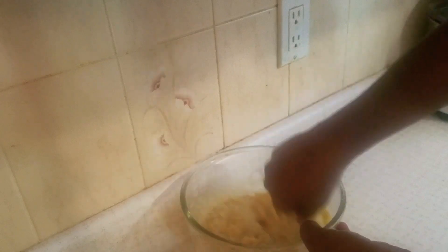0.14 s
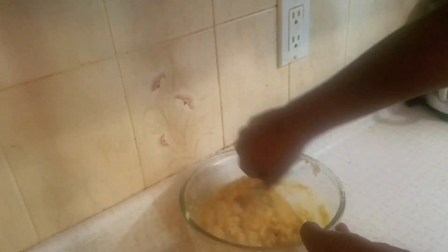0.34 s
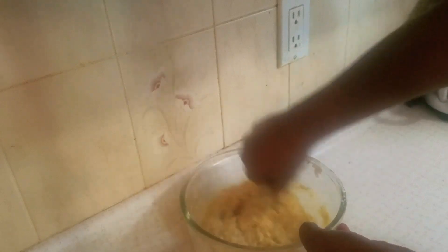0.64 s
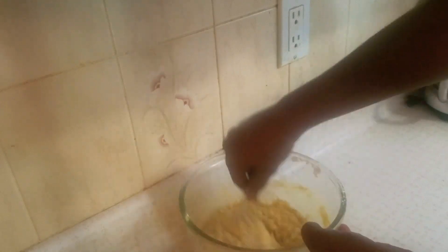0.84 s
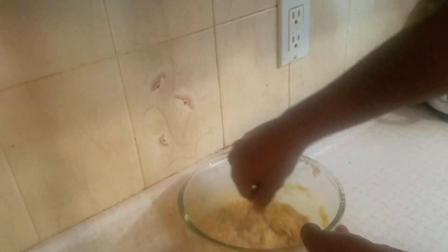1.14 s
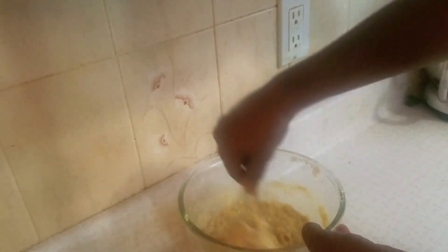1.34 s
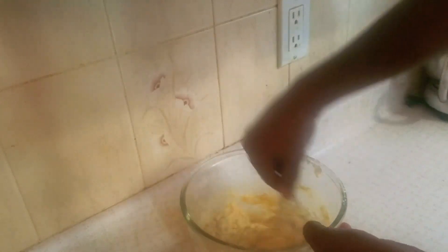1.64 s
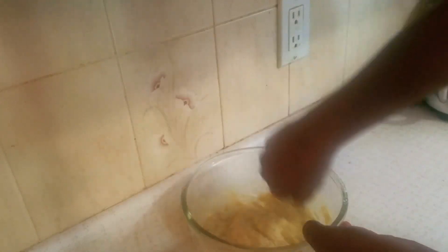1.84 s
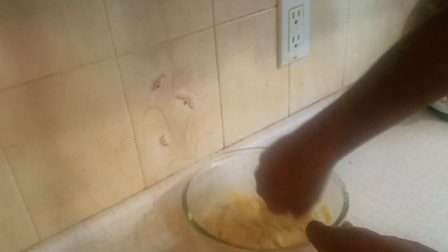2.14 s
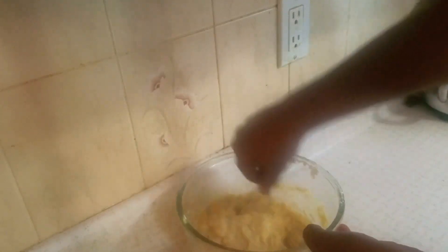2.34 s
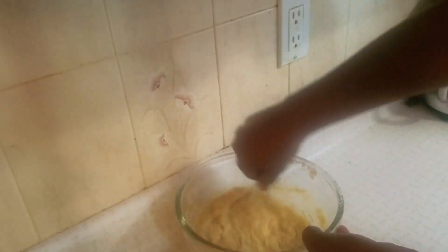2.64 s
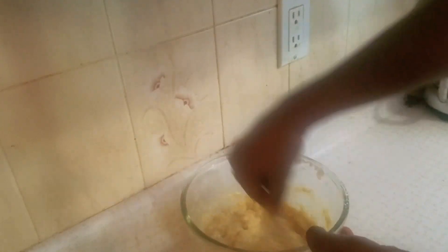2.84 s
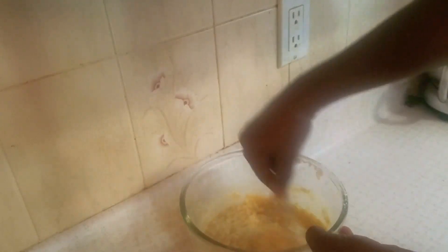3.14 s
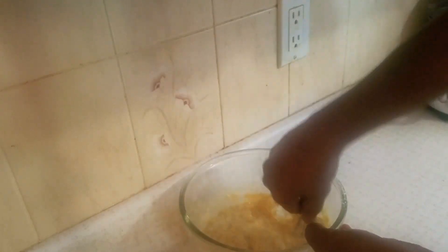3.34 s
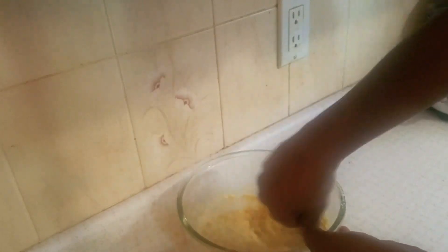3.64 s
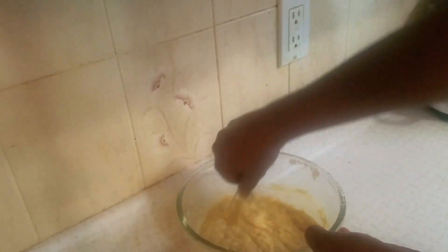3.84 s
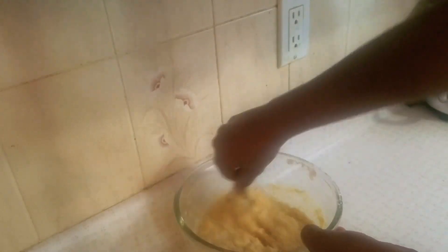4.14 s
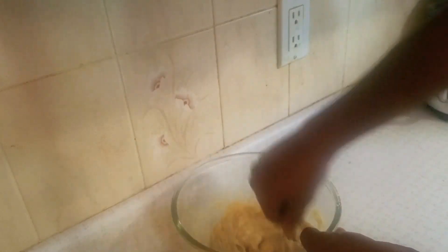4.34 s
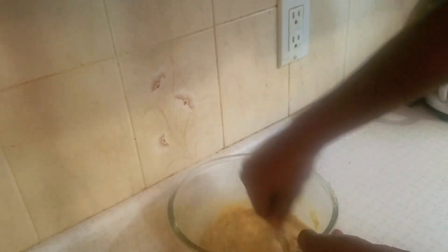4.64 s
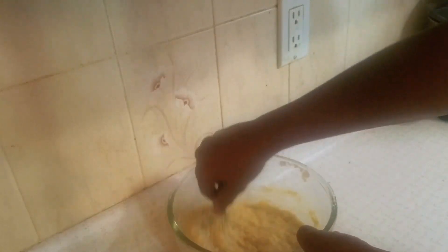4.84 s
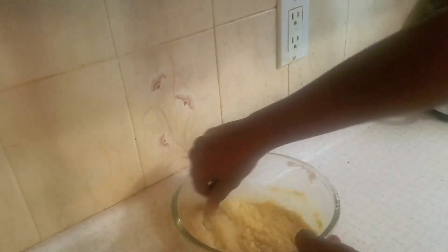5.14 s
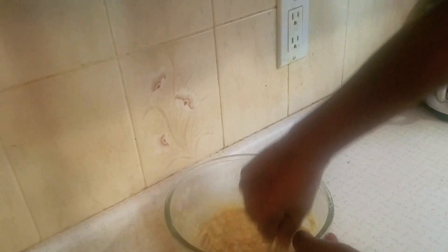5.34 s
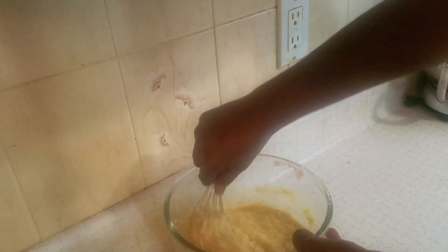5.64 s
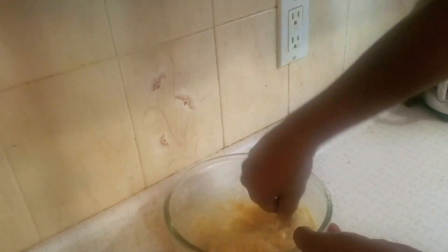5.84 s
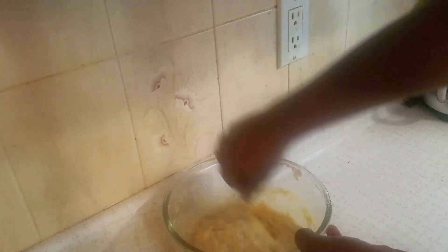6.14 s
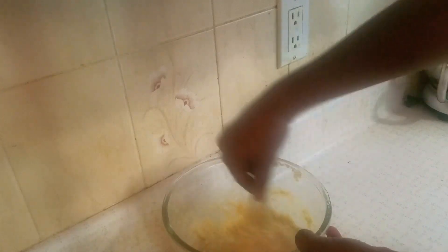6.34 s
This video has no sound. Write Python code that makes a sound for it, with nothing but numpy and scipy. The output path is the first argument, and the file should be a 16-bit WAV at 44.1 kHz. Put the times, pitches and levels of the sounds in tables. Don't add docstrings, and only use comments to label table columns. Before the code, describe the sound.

Close stereo sound of a wire whisk beating thick batter in a glass bowl, in a tiled kitchen with short bright echo and faint fridge hum. From the start there is wet, heavy sloshing with scratchy wire scrapes and light fizz. A strong hollow knock comes at 0.4 s, a bright scrape near 0.5, a duller bump at 0.6 and another knock at 0.9. Softer churning follows with small ticks around 1.3. At 1.85 a sharp metallic slap cracks on the glass. From 2 to 3 s come wet strokes, fine ticks and a longer drag at 2.7. A quick double knock with low boom hits at 3.3, then knocks at 3.6, 3.85, 4.2, a loud one at 4.5, 4.8, 5.1 and a last hard one at 5.2, with short bowl rings. Afterwards the churning quietens, with sticky smacks and a faint clink at 6.2 until about 6.5.

```python
import sys
import numpy as np
from scipy import signal
from scipy.io import wavfile
from scipy.ndimage import uniform_filter1d

SR = 44100
rng = np.random.default_rng(int(sys.argv[2]) if len(sys.argv) > 2 else 0)


def digitize_waveform(pressure):
    field = np.atleast_2d(pressure).T
    bounded = np.clip(field, -1, 1)
    quanta = np.round(bounded * 32767).astype(np.int16)
    wavfile.write(sys.argv[1], SR, quanta)


def undo_db(level):
    steps = np.asarray(level, float) / 20
    return 10 ** steps


N = 286650

# t/s, thock peak level/dB, counter boom level/dB, hardness/dB, body ring level/dB
KNOCK_EVENTS = [(0.376, -6.5, -19.5, -23, -13), (0.614, -24, -11.5, -33, -14),
                (0.908, -10.5, -17.5, -23.5, -13), (1.847, -31.5, -10, -16.5, -5),
                (3.266, -27.5, -3.5, -18.5, -7), (3.299, -32.5, -3, -24, -8), (3.572, -43, -4, -21, 4.5),
                (3.849, -11, -14.5, -26, -2), (4.18, -9.5, -14, -22, -13), (4.521, -4.5, -14, -19.5, -3.5),
                (4.799, -20, -16, -29, -14), (5.133, -38, -19, -26, -9), (5.23, -4.5, -16.5, -17, -7)]


def rms_one(x):
    return x / np.sqrt(np.mean(x ** 2) + 1e-20)


def at_hz(points, hz):
    table_hz, value = np.array(points)[:, :2].T
    return np.interp(np.log(hz), np.log(table_hz), value)


def lean(hz):
    # f/Hz, left minus right level/dB
    left_right_db = [(60, -2.5), (150, -1.5), (380, -4.5), (950, -3.0), (2380, -3), (5980, -4.5),
                     (15000, 1)]
    return undo_db(at_hz(left_right_db, hz) * np.array([[0.5], [-0.5]]))


def drift(rate_hz):
    r = np.exp(-80 * np.pi * rate_hz / SR)
    noise = rng.standard_normal(N // 40 + 2002)
    slow = signal.lfilter([1], [1, -2 * r, r * r], noise)[2000:]
    return np.interp(np.arange(N) / 40, np.arange(len(slow)), rms_one(slow))


def ring(clicks, hz, t60_s):
    r, w = undo_db(-60 / (t60_s * SR)), 2 * np.pi * hz / SR
    return signal.lfilter([0, np.sin(w)], [1, -2 * r * np.cos(w), r * r], clicks + 1e-18)


def bandpass(low_hz, high_hz):
    return signal.butter(2, [low_hz, high_hz], "band", fs=SR, output="sos")


def stereo_bands(source, low_hz, high_hz, likeness):
    edges_hz = np.geomspace(low_hz, high_hz, int(np.log2(high_hz / low_hz) * 2.0) + 2)
    for k, (low, high) in enumerate(zip(edges_hz, edges_hz[1:])):
        mid, side = signal.sosfilt(bandpass(low, high), source[k % 2])
        hz = np.sqrt(low * high)
        alike = np.clip(at_hz(likeness, hz), -1, 1)
        pair = np.sqrt(1 + alike) * mid + np.sqrt(1 - alike) * side * [[1], [-1]]
        yield hz, pair * lean(hz)


def wet_noise(spectrum, grains_per_s, grain_db, smooth, patchy_db):
    # f/Hz, left-right likeness
    port_likeness = [(60, 0.94), (150, 0.91), (380, 0.95), (950, 0.093), (2380, 0.045), (5980, 0.01),
                     (15000, 0.089)]
    born = rng.random((2, 1, N)) < grains_per_s * undo_db(3.0 * drift(9)) / SR
    size = born * undo_db(grain_db * np.minimum(rng.exponential(1, (2, 1, N)), 4))
    gate = signal.lfilter([1], [1, -0.985], size)
    source = rng.standard_normal((2, 2, N)) * (smooth + rms_one(gate))
    together = drift(16.0)
    low_hz, high_hz = spectrum[1][0] / 1.3, min(spectrum[-2][0] * 1.333, 17000)
    total = 0
    for hz, pair in stereo_bands(source, low_hz, high_hz, port_likeness):
        flicker_db = patchy_db * (0.5 * together + drift(13.1))
        total = total + undo_db(at_hz(spectrum, hz) + flicker_db) * pair
    return rms_one(total)


def swells(s, db, fade_s, rise_share):
    t = np.arange(0, N, 64)[:, None] / SR - s
    power = np.sum(undo_db(db - 10 * np.maximum(t, -t / rise_share) / fade_s) ** 2, axis=1)
    return np.interp(np.arange(N) / 64, np.arange(len(t)), power)


def gain_ride():
    # t/s, depth level/dB, recovery t/s
    ducks = [
        (0.376, 12, 0.11),
        (4.521, 11, 0.18),
        (5.23, 11.5, .5),
    ]
    attack_s = 0.065
    db, t = 0, np.arange(N) / SR
    for s, depth_db, back_s in ducks:
        since = np.maximum(t - s, 0)
        db = db - depth_db * (1 - np.exp(-since / attack_s)) * np.exp(-since / back_s)
    return undo_db(db)


def fridge_and_air(gain):
    # f/Hz, width f/Hz, level/dB
    hum_lines = [ (42, 25, -13), (58.8, 12, 0), (82, 22, -14), (100, 14, -9), (120, 9, 0), (174, 8, -8),
                 (300, 12, -11)]
    # f/Hz, density level/dB per Hz
    air_spectrum = [(74, -34), (125, -6.5), (203, -8.5), (312, -5), (497, -15), (550, -15.5), (843, -18),
                    (1520, -28), (2790, -34), (8020, -49), (15100, -37.5), (16000, -45)]
    hum = 0
    for hz, width_hz, db in hum_lines:
        has_core = hz in (58.8, 120)
        core = 1.8 * has_core * np.sin(2 * np.pi * hz * np.arange(N) / SR)
        skirt = rms_one(ring(rng.standard_normal(N), hz, 2.2 / width_hz))
        hum = hum + undo_db(db) * (core + skirt) * lean(hz)
    air = wet_noise(air_spectrum, 54, grain_db=0.5, smooth=24.0, patchy_db=1.07)
    return gain * undo_db(-42.5) * (undo_db(-4.0) * rms_one(hum) + undo_db(-7.0) * air)


def churn(gain):
    # peak t/s, scrape level/dB, fizz level/dB, 10 dB fade t/s
    strokes = [(0.0, -52.5, -58, 0.23), (0.181, -47, -54, 0.03), (0.34, -59, -55, 0.3),
               (0.47, -42.5, -47.5, 0.017), (0.74, -47.5, -58, 0.11), (0.89, -61, -56.5, 0.12),
               (1.08, -54, -58, 0.1), (1.4, -65.5, -64, .2), (1.66, -52.5, -58.5, 0.06),
               (1.58, -56, -60, .05), (1.989, -51.5, -52.5, 0.08), (2.17, -54.5, -59, 0.12),
               (2.3, -53, -57, 0.11), (2.55, -54.5, -59, .1), (3.02, -53, -61, .03),
               (3.12, -56.5, -57.5, 0.24), (3.43, -52, -57, 0.08), (3.55, -54, -65, 0.02),
               (3.67, -53.5, -57, 0.07), (3.85, -55, -63, 0.02), (4.0, -57, -63, .15),
               (4.18, -52.5, -59, 0.07), (4.31, -46.5, -52.5, 0.0555), (4.62, -51, -58, 0.0957),
               (5.03, -57, -70, 0.13), (5.34, -53, -62.5, 0.08), (6.25, -62.5, -64.5, 0.26),
               (6.49, -61, -66, 0.1)]
    # t/s, scrape level/dB, fizz level/dB, 10 dB fade t/s
    slaps = [
        (1.849, -32, -38, .025),
        (2.74, -45, -54, .13),
        (3.263, -38, -56, .025),
    ]
    # t/s, level/dB
    heaves = [(0.0, -47), (0.8, -50), (2.55, -44), (2.8, -48), (3.7, -45), (5.02, -44), (5.9, -53)]
    # f/Hz, density level/dB per Hz
    slosh_spectrum = [(76, -19), (130, 13), (145, -11.5), (167, 8), (248, -11.5), (364, 2.5), (401, -0.5),
                      (1300, -16), (1690, -49), (2860, -120)]
    scrape_spectrum = [(590, -31), (1000, -0.5), (1270, -9), (1770, -8.5), (1970, 5.5), (2260, -9.5),
                       (6210, -21), (8500, -19.5), (11000, -60), (18700, -120)]
    fizz_spectrum = [(4120, -18), (7000, -2), (8530, -28), (9880, -2), (15100, 2), (16000, -4),
                     (16500, -24)]
    stroke_rise_share, slap_rise_share = 0.75, 0.06
    rest_scrape_db, rest_fizz_db = -68, -71
    fold_db, fold_follows, fold_smear_s = -50, 0.3, 0.06
    splash_db, splash_lag_s, splash_fade_s = -35.5, 0.1, 0.14

    s, scrape_db, fizz_db, fade_s = np.transpose(strokes)
    drag = swells(s, scrape_db, fade_s, stroke_rise_share) + (gain * undo_db(rest_scrape_db)) ** 2
    wet = swells(s, fizz_db, fade_s, stroke_rise_share) + (gain * undo_db(rest_fizz_db)) ** 2
    s, scrape_db, fizz_db, fade_s = np.transpose(slaps)
    slap_drag = swells(s, scrape_db, fade_s, slap_rise_share)
    slap_wet = swells(s, fizz_db, fade_s, slap_rise_share)

    effort_db = uniform_filter1d(10 * np.log10(drag), round(fold_smear_s * SR))
    fold = gain * undo_db(fold_db + fold_follows * (effort_db - effort_db.mean()))
    knock_s, knock_db = np.array(KNOCK_EVENTS)[:, :2].T
    splash = swells(knock_s + splash_lag_s, knock_db + splash_db, splash_fade_s, rise_share=0.4)
    heave = swells(*np.transpose(heaves), 0.1, rise_share=1.1)

    slosh = wet_noise(slosh_spectrum, 90, grain_db=-7.0, smooth=2.1, patchy_db=4.5)
    slosh = np.sqrt(fold ** 2 + splash + heave) * slosh
    scrape = wet_noise(scrape_spectrum, 250, grain_db=4.0, smooth=1.0, patchy_db=1.5)
    scrape = np.sqrt(drag + slap_drag) * scrape
    fizz = wet_noise(fizz_spectrum, 300, grain_db=3.5, smooth=1.0, patchy_db=1.5)
    fizz = np.sqrt(wet + slap_wet) * fizz
    shaken = undo_db(-44.5) * ring(slosh, 181.7, 0.079) + undo_db(-43.0) * ring(slosh, 377.8, 0.11)
    return slosh + shaken + scrape + fizz


def contacts():
    # t/s, peak level/dB, centre f/Hz, glass clink level/dB
    wire_ticks = [(0.0867, -45, 2970, -19), (0.187, -33, 3240, -14), (0.4448, -31, 2660, -1),
                  (0.4616, -29.5, 3800, -22), (0.625, -40, 4500, -15), (0.6815, -41, 3070, -8),
                  (0.7417, -35, 2790, -14), (1.2933, -35.5, 7190, -22), (1.311, -42, 4900, -18),
                  (1.354, -43, 5490, -17), (1.3782, -33, 6600, -29), (1.8168, -42, 2660, -13),
                  (1.8467, -13, 6800, -18), (1.8472, -8, 2600, -16), (2.1276, -38, 4440, -18),
                  (2.141, -33, 2590, -19), (2.148, -35, 3780, -7), (2.2405, -40, 3280, 0),
                  (2.2795, -30, 2500, -10), (2.195, -42, 5200, -15), (3.016, -38, 2470, -9),
                  (3.246, -35, 2510, -12), (3.2608, -21, 2300, -5), (3.6553, -43, 3260, -2),
                  (4.2413, -40, 3790, -7), (4.264, -39, 3940, -7), (4.5478, -40, 2610, 15),
                  (4.959, -37, 5960, -6), (5.8187, -51, 2650, -7)]
    # t/s, peak level/dB, centre
    # f/Hz, top-band spit level/dB
    batter_smacks = [(0.0418, -53.5, 3050, 7.5), (0.171, -44, 2630, -7), (0.5636, -44.5, 2670, -6),
                     (0.597, -42.5, 4750, -8), (0.7132, -38, 2610, -9), (1.507, -45, 5970, -8),
                     (1.531, -59, 2580, 9), (1.585, -38, 2570, -4.5), (1.7499, -60, 2680, 6),
                     (2.221, -45, 3240, -7), (2.4802, -31, 9900, -10.5), (2.6843, -45, 3250, -2),
                     (2.738, -42.5, 2810, -8), (3.508, -56, 3550, -5), (3.5354, -33.5, 2720, -6.5),
                     (3.776, -57, 2570, -2), (3.8186, -39, 3780, -10), (3.9632, -56, 2540, 6.5),
                     (4.001, -45.5, 3180, -0.5), (4.2964, -25.5, 5300, -12), (4.815, -48, 2550, -8.5),
                     (5.173, -42.5, 4300, -10.5), (5.2318, -20.5, 2530, -34), (5.7162, -47, 2700, -14),
                     (5.7383, -47, 3950, -10), (5.879, -47, 2830, -10), (6.07, -53, 2540, -4),
                     (6.1606, -50, 2540, -3), (6.255, -48, 4570, -9), (6.4457, -43, 3200, -8)]
    tick_t60_s, tick_spit_db, sharpen_db = 0.012, -18, 40
    glass_dries = 0.6
    smack_t60_s, smack_clink_db = 0.015, -12
    rattles = [(s + 0.001498, db + hard_db - 11.5, 2700, 19) for s, db, _, hard_db, _ in KNOCK_EVENTS]
    rows = []
    for s, db, hz, clink_db in list(wire_ticks) + rattles:
        spit_db = tick_spit_db - glass_dries * max(clink_db, 0)
        t60_s = tick_t60_s * 2 ** (-(db + 40) / sharpen_db)
        rows.append((s, db, hz, clink_db, spit_db, t60_s))
    for s, db, hz, spit_db in batter_smacks:
        rows.append((s, db, hz, smack_clink_db, spit_db, smack_t60_s))
    return rows


def ticks():
    port_lag_s = 0.0002
    near, bare = np.zeros((2, N + 2000)), np.zeros(N + 2000)
    t = np.arange(1300) / SR
    clink_sos, clink_tilt = bandpass(1205, 1865), lean(1865)
    spit_sos, spit_tilt = bandpass(11000, 18100), lean(18100)
    for s, db, hz, clink_db, spit_db, t60_s in contacts():
        a, b = rng.standard_normal((2, len(t)))
        t60_s = np.clip(t60_s * 1.27, 0.002, 0.05)
        i = round((s + 0.0005) * SR)
        envelope = undo_db(-60 * t / t60_s) * np.minimum(t / 0.00056, 1)
        burst = np.array([a + 0.5 * b, a - 0.5 * b]) * envelope
        burst[:, 0] = 4.2 * np.sign(a[0])
        snap_low_hz, snap_high_hz = hz / 1.67, hz * 1.42
        parts = [(clink_sos, clink_tilt, clink_db + 0.5),
                 (bandpass(snap_low_hz, snap_high_hz), lean(snap_high_hz), -1.5),
                 (spit_sos, spit_tilt, spit_db + 16.0)]
        for sos, tilt, part_db in parts:
            left, right, click = signal.sosfilt(sos, [*burst, t == 0])
            pair = np.array([left, right]) / np.abs(left).max()
            near[:, i:i + len(t)] += undo_db(db + part_db) * pair * tilt
            click = click / np.abs(click).max()
            bare[i:i + len(t)] += undo_db(db + part_db) * np.sqrt(t60_s / 0.025) * click
    near[1] = np.roll(near[1], round(port_lag_s * SR))
    return near[:, :N], bare[:N]


def knocks():
    # f/Hz, level/dB, t60/s
    counter_modes = [(54.4, -12, 0.12), (115.2, 5.5, 0.17), (182.8, -3, 0.22), (188.1, -3.5, 0.27),
                     (219, -0.5, 0.23)]
    # f/Hz, level/dB, t60/s
    bowl_modes = [(255, -13, 0.14), (318, -11.5, 0.15), (328, -9, 0.15), (376.3, 6, 0.16), (432, -2, 0.16),
                  (480, -23, 0.14), (527, -2, 0.3), (621.6, 1.5, 0.088), (726, -3.5, 0.2), (790, -24, .1),
                  (947, -18, 0.081), (1070, -3.5, 0.067), (1393, -5.5, 0.097), (1600, -15, 0.074)]
    # f/Hz, level/dB
    crack_modes = [(800, 6.3), (1150, 9.7), (1650, 3.4), (2400, 12.6), (3400, 0.7)]
    s, peak_db, boom_db, hard_db, ring_db = np.transpose(KNOCK_EVENTS)
    at = np.round((s + 0.0016) * SR).astype(int)
    chance_db = rng.normal(0, 2, (len(s), 40))

    def blows(db, contact_hz, late_s=0):
        clicks, r = np.zeros(N), np.exp(-2 * np.pi * contact_hz / SR)
        clicks[at + round(late_s * SR)] = -undo_db(peak_db + db)
        return signal.lfilter([(1 - r) ** 2], [1, -2 * r, r * r], clicks + 1e-18)

    thock = ring(ring(blows(-22.5, 2600), 507, 0.015), 398.6, 0.014)

    crack = sum(ring(blows(hard_db + db, 2110), hz, 5.3 / hz) for hz, db in crack_modes)
    crack = signal.sosfilt(signal.butter(3, 4200.0, fs=SR, output="sos"), crack)

    boom = 0
    for k, (hz, db, t60_s) in enumerate(counter_modes):
        blow_db = db + boom_db + 10.0 + chance_db[:, 20 + k]
        boom = boom + ring(blows(blow_db, 127.0, 0.0045), hz, t60_s)
    body = signal.sosfilt(signal.butter(2, 75.0, "high", fs=SR, output="sos"), boom)
    for k, (hz, db, t60_s) in enumerate(bowl_modes):
        high_share = np.clip(np.log2(hz / 500), 0, 1)
        reach_db = ring_db + (hard_db + 21.5 - ring_db) * high_share
        blow = blows(db - 8.0 + reach_db + chance_db[:, k], 916, 0.00406)
        body += ring(blow, hz, t60_s) * (-1) ** k
    return thock, crack, body


def clinks():
    # t/s, peak level/dB, f/Hz, t60/s
    wire_notes = [
        (1.441, -38, 1300, 0.028),
        (2.1512, -37.5, 1860, 0.034),
        (3.263, -29, 1295, 0.027),
        (6.2014, -49, 1110, 0.033),
    ]
    total = 0
    for s, db, hz, t60_s in wire_notes:
        click = undo_db(db) * (np.arange(N) == round(s * SR))
        total = total + ring(click, hz, t60_s)
    return total


def kitchen(x):
    # f/Hz, t60/s
    room_t60 = [(60, 0.65), (300, 0.37), (1500, 0.47), (5000, 0.36), (14000, 0.38)]
    # f/Hz, left-right likeness
    room_likeness = [(100, 0.99), (300, 0.9), (700, 0.3), (1500, 0.067), (8000, 0.033)]
    t = np.arange(int(0.6 * SR)) / SR
    bands = stereo_bands(rng.standard_normal((2, 2, len(t))), 46.45, 17060, room_likeness)
    tail = sum(pair * undo_db(-60 * t / at_hz(room_t60, hz)) for hz, pair in bands)
    tail = tail * np.clip((t - 0.003) / 0.0017, 0, 1)
    tail = tail / np.sqrt(np.sum(tail ** 2) / 2)
    return signal.fftconvolve(x[None], tail, axes=1)[:, :N]


def scene():
    gain = gain_ride()
    thock, crack, body = knocks()
    tick, click = ticks()
    clink = clinks()
    sent = undo_db(-5.0) * thock + undo_db(6.0) * crack + undo_db(-11.5) * clink + undo_db(-14.0) * body + undo_db(-2.0) * click
    direct = (thock + crack + clink + body) * lean(260) + tick
    return direct + kitchen(sent) + churn(gain) + fridge_and_air(gain)


def band_limit(x):
    return signal.sosfilt(signal.butter(12, 16830, fs=SR, output="sos"), x)


def record(dry):
    x = signal.sosfilt(signal.butter(2, 36.0, "high", fs=SR, output="sos"), dry)
    x = 1.6 * np.tanh(x / 1.6)
    x = signal.sosfilt(signal.cheby2(12, 50, 16300, fs=SR, output="sos"), x)
    return band_limit(x)


dry = scene()
out = record(dry)
digitize_waveform(out)
```